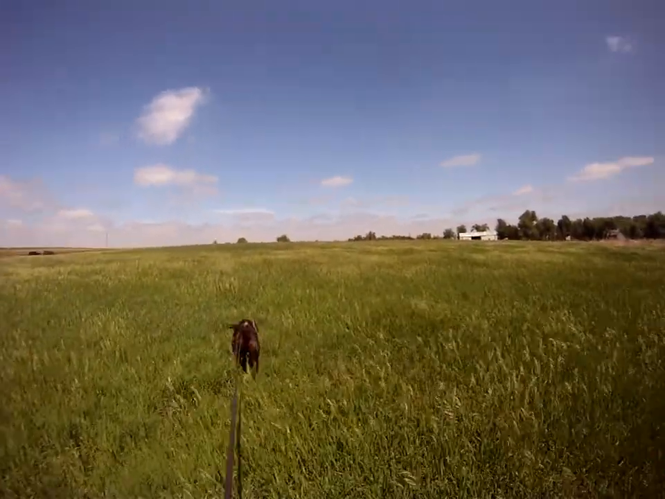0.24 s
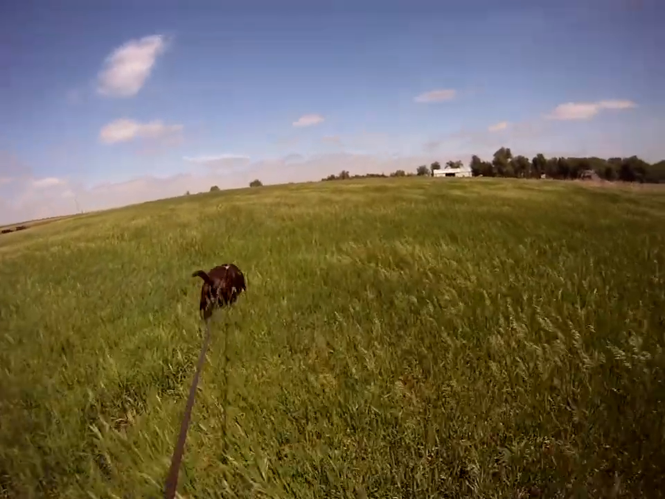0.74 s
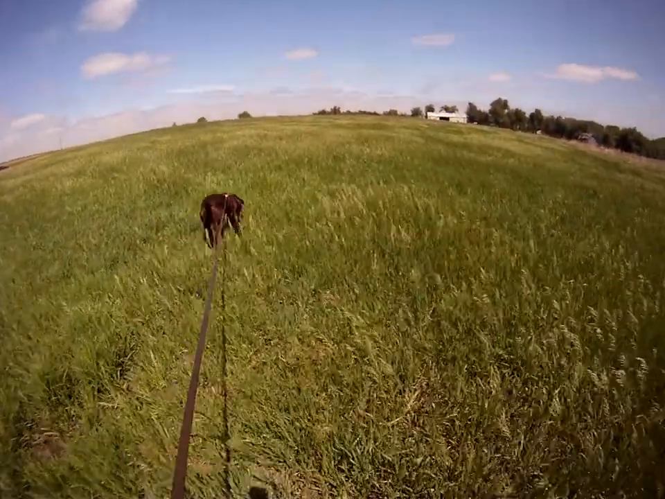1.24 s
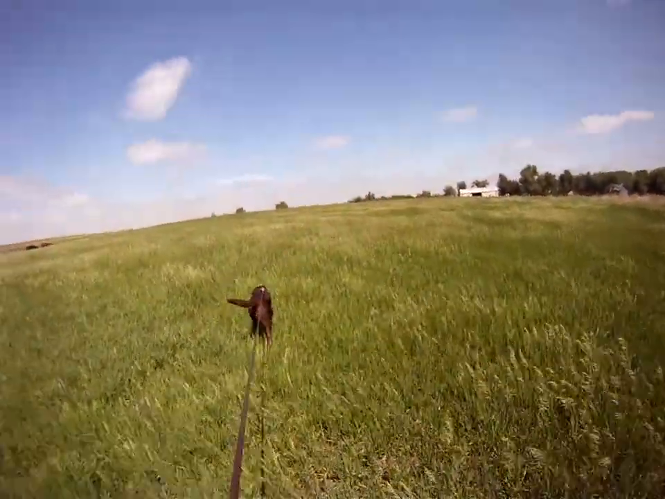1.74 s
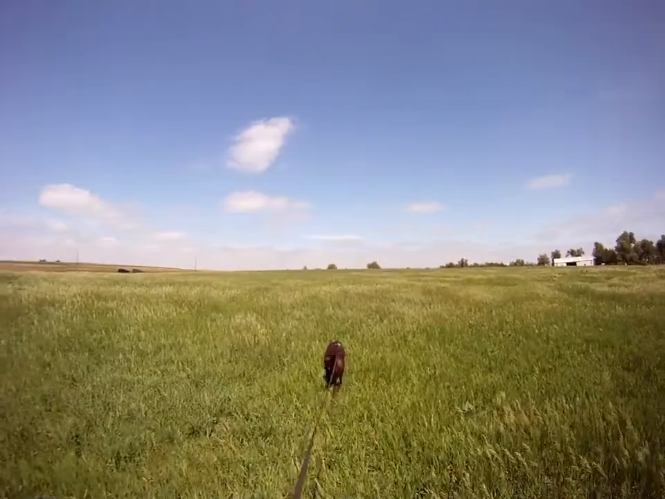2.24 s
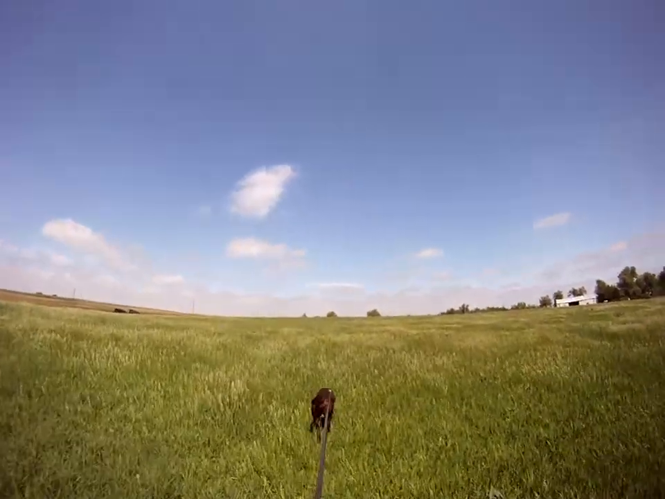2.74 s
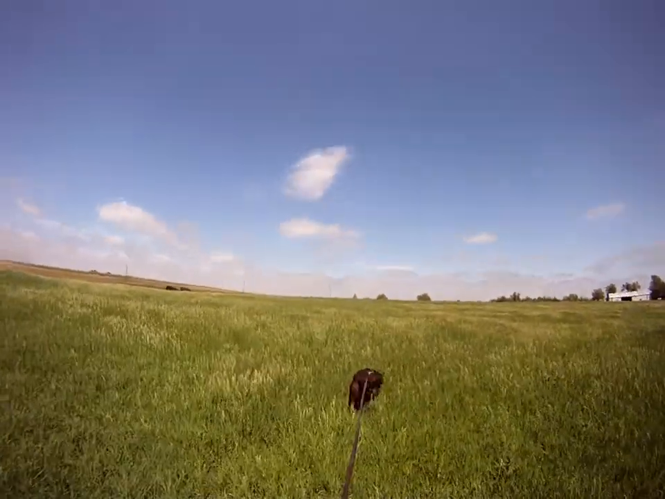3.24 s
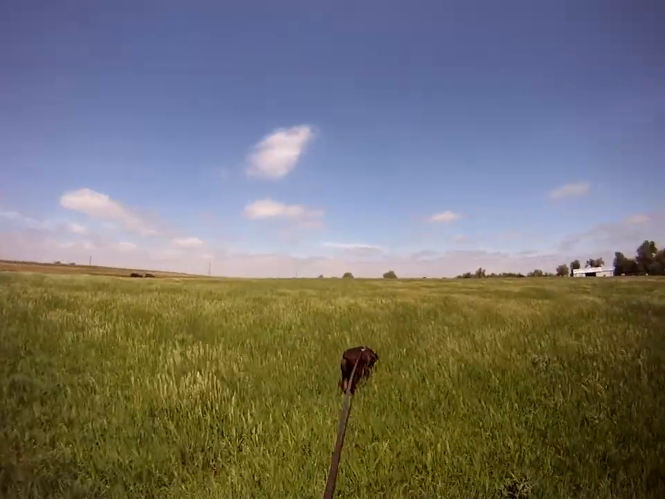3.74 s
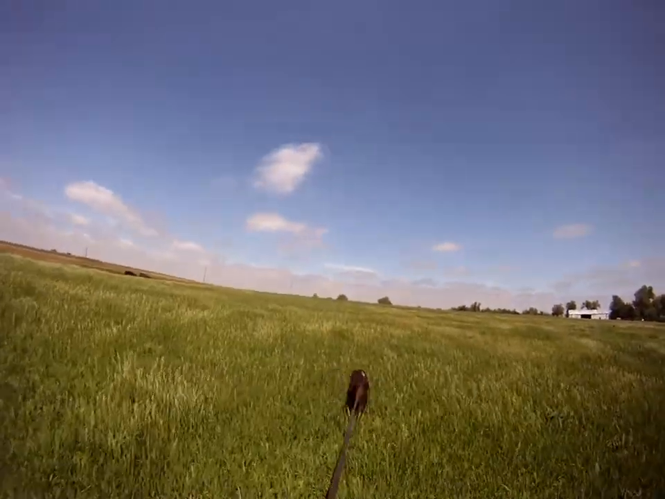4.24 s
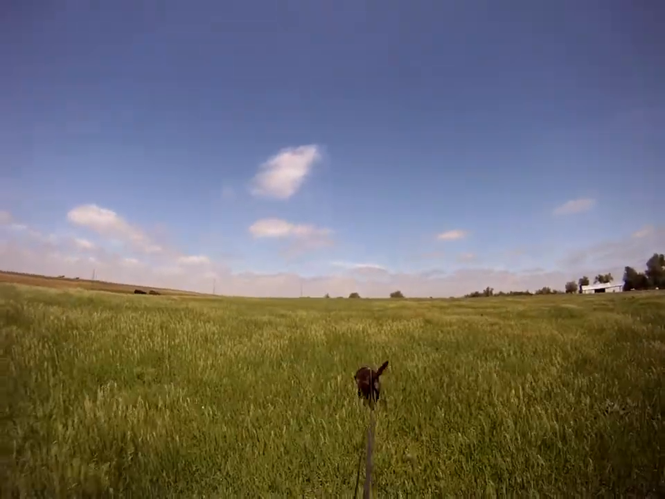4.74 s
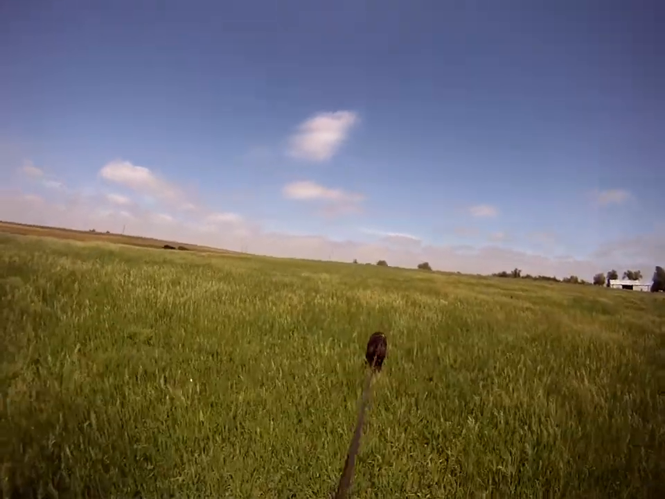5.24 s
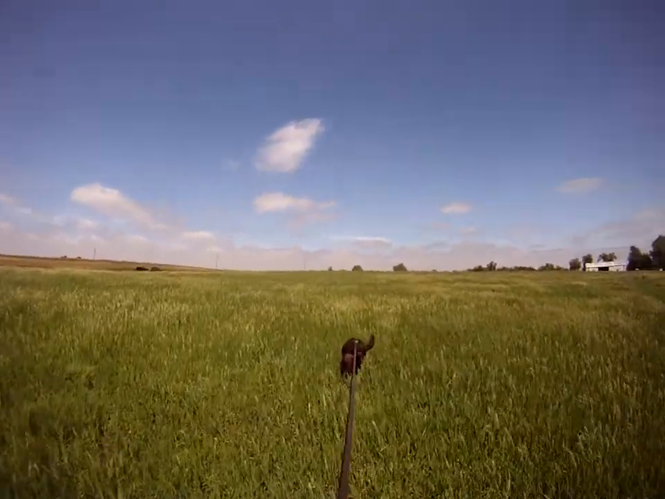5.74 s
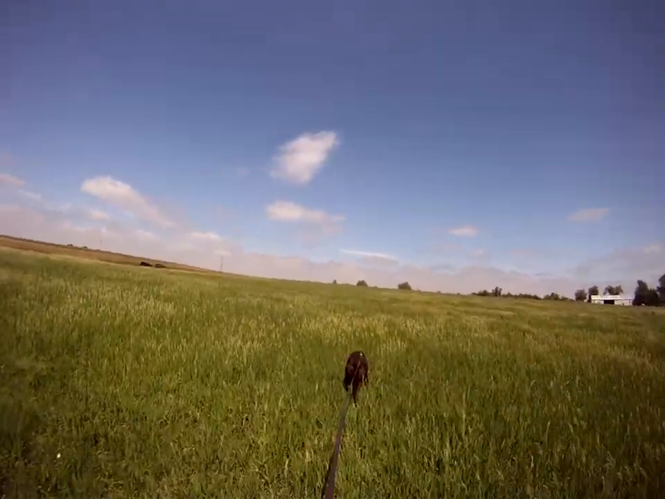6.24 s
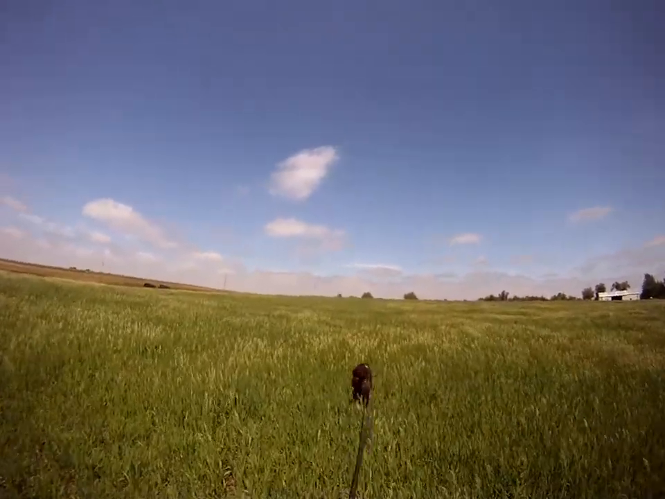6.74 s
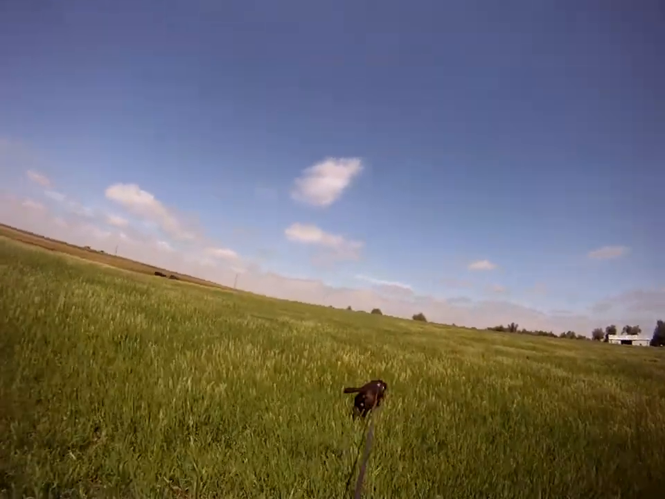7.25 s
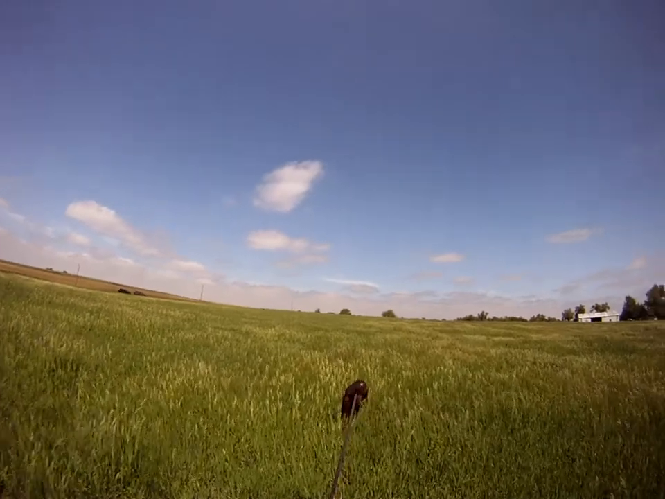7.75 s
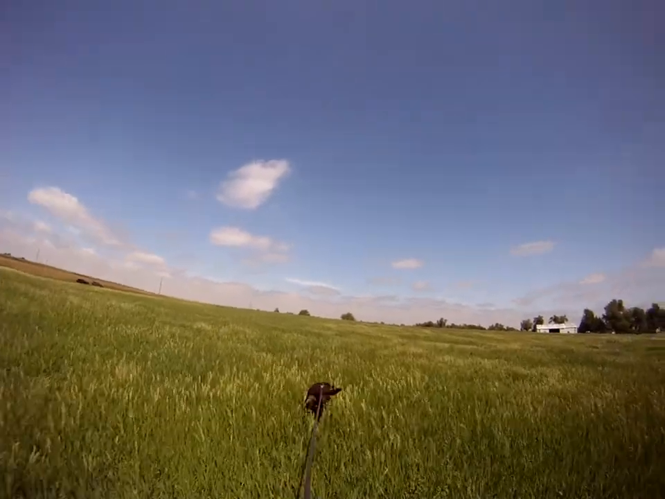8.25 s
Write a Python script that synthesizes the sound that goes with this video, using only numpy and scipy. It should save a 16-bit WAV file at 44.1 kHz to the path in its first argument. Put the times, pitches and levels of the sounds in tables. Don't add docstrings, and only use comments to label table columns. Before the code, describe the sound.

Someone walks at an even pace through an open grassy field. The close, boxy, low-quality pickup turns footfalls into very low body thuds, while a loose piece inside the case makes short bright clicks and fast dying bounces. Stems brush softly past, occasionally dragging on the case. Light wind buffets beneath. One faint bird whistle passes, then two hollow strap taps; walking continues to the end.

```python
import sys
import numpy as np
from scipy import signal
from scipy.fft import rfft, irfft, next_fast_len
from scipy.io import wavfile

SR = 44100
rng = np.random.default_rng(int(sys.argv[2]) if len(sys.argv) > 2 else 0)


def pcm_store(signal):
    levels = np.round(np.clip(np.atleast_2d(signal), -1, 1) * 32767)
    wavfile.write(sys.argv[1], SR, levels.astype(np.int16).T)


def amplitude_ratio(level_db):
    exponent = np.asarray(level_db, float) / 20
    return 10 ** exponent


N = 373963

# crest in seconds, peak in dB, sway in Hz, rebound delay in seconds, rebound peak in dB.
FOOTFALLS = [(0.305, -24, 28.3, 0.069, -26.5), (0.862, -21.5, 32.6, 0.05, -29),
             (1.39, -20.5, 32, 0.05, -28), (1.927, -20.6, 25.6, 0.031, -36), (2.496, -21.5, 40, 0.07, -22),
             (3.005, -25.5, 29.5, 0.065, -30.5), (3.449, -19.5, 24.5, 0.061, -28),
             (3.943, -25, 26.6, 0.082, -31.5), (4.456, -35, 15.6, 0.057, -39),
             (4.953, -19.5, 26.5, 0.061, -37), (5.464, -25, 19, 0.061, -38),
             (5.934, -23.5, 31, 0.0736, -30), (6.412, -21.5, 26.3, 0.058, -31),
             (6.914, -26, 28.4, 0.073, -32.5), (7.474, -28, 33.6, 0.032, -41),
             (7.971, -22, 31.4, 0.043, -30.5), (8.423, -17.5, 25, .023, -24.5)]
# crest in seconds,
# peak in dB, sway in Hz.
EXTRA_JOLTS = [(0.823, -33.5, 17), (1.346, -35.5, 17.4), (1.893, -28, 49), (1.958, -28.5, 45), (2.446, -29.5, 33),
               (2.977, -29.5, 30.5), (3.409, -34, 53), (3.913, -36, 40), (4.921, -36, 22), (5.428, -32, 30),
               (7.438, -29, 21), (7.944, -27, 16.5), (8.373, -42, 11)]
# frequency in Hz, level in dB per Hz.
THUD_SPECTRUM = [(35, -17), (55, 11), (80, -3.5), (120, -17), (200, -36), (300, -63)]
JOLT_TURNS = 0.81
REBOUND_HZ = 26.35

# start in seconds, peak in dB, first flight in seconds, loss in dB a bounce.
DROPS = [(0.1, -38.5, 0.014, 1.5), (.134, -44, 0.0054, 1), (.391, -30.5, 0.0082, 4),
         (.8582, -44.5, 0.0058, 4), (.9055, -38.5, 0.0037, 11), (0.9438, -38, 0.0057, 9),
         (1.1735, -42.5, 0.0049, 7), (1.3494, -45.5, .0054, 2.5), (1.4633, -42, 0.0054, 3),
         (1.779, -41.5, 0.0099, -1.5), (1.9957, -39.5, 0.0042, 11), (2.014, -29, 0.011, 6.5),
         (2.2934, -36.5, 0.011, 2), (2.439, -40, .0056, 4.5), (2.5181, -38, 0.0028, 8),
         (2.6805, -30, 0.011, 1), (2.9569, -40.5, 0.009, 8), (3.4212, -40.5, 0.005, 0),
         (3.4628, -36.5, 0.0062, 6), (3.7989, -30.5, 0.011, 5), (4.2312, -42.5, 0.0078, 1),
         (4.6448, -41, 0.0092, 8), (4.9977, -26.5, 0.0073, 5.5), (5.4934, -26.5, 0.0076, 2),
         (5.6902, -42, 0.0084, -1.3), (5.9424, -38.5, .0135, 3.5), (6.3683, -39.5, 0.0092, 5),
         (6.4345, -29, 0.0062, 2.5), (6.6457, -44.5, 0.0084, 4.5), (7.1522, -45.5, 0.0075, 0.5)]
# time in seconds, peak in dB.
TICKS = [(1.4296, -50), (1.5223, -38.5), (1.7629, -37), (1.8659, -43.5), (2.2887, -34.5), (2.5754, -42),
         (3.5886, -42.5), (4.2184, -46.5), (4.9605, -44), (5.2789, -41), (5.2886, -33.5), (5.3077, -43),
         (5.4423, -37.5), (5.4729, -45), (5.5885, -44), (6.0981, -44), (6.422, -42), (6.6309, -41),
         (8.0427, -42), (8.4173, -41.5),
         (0.4292, -43.5), (.5053, -50), (.9217, -50), (1.1699, -49), (1.2384, -48), (1.401, -51),
           (1.744, -47), (1.8822, -47), (1.9512, -45), (2.6509, -49), (2.9166, -49), (2.9769, -52),
           (3.2307, -49.5), (4.0292, -52.5), (4.6143, -53), (5.0921, -48), (5.5177, -47), (5.6844, -54),
           (5.7183, -48), (5.7303, -48), (5.3182, -52), (3.5786, -52), (6.0165, -55), (6.1932, -48.5),
           (6.1994, -51), (6.3601, -44), (7.0453, -50.5), (8.1033, -50), (8.1748, -48), (8.1816, -51)]
# frequency in Hz, level in dB, 60 dB decay in seconds.
CASE_MODES = [(1850, -7, 0.0082), (2258, -3, 0.01), (3000, -34.5, 0.0012), (3365, -7, 0.022),
              (3776, 5, 0.0089), (4020, -30, 0.011), (4455, -3, 0.0087), (4850, -2, 0.0069),
              (5600, -22, 0.0075), (5860, -1, 0.0047)]
FLIGHT_SHRINK, TIRING_DB, UNEVEN_DB = 0.75, 1.1, -1
LEAD_IN_S, LEAD_IN_DB, LEAD_IN_FOLLOWS = 0.004, -53.5, 0.31
CHATTER_S, CHATTER_DB, CHATTER_SPREAD_DB = 0.0032, -14.5, 2
MODE_SCATTER_DB = 2.0
DIP_HZ, DIP_WIDTH_HZ = 4270, 200

# time in seconds, peak in dB, mode in Hz, 60 dB decay in seconds.
STRAP_TAPS = [
    (5.638, -30, 997, 0.019),
    (5.638, -53, 1150, 0.01),
    (6.098, -31.5, 1476, 0.016),
    (6.098, -23, 1680, 0.0074),
    (6.098, -27.5, 2110, 0.0094),
    (6.098, -39, 900, 0.014),
]

# middle in seconds, half-length in seconds, port in dB, hollow in dB.
DRAGS = [
    (1.512, 0.027, -53, -64),
    (2.296, 0.054, -61, -80),
    (3.388, 0.094, -75, -63.5),
    (3.993, 0.022, -57.5, -78),
    (4.883, 0.053, -54.5, -64),
    (6.85, 0.028, -54, -56),
    (8.367, 0.072, -52.5, -63),
]
PORT_HZ, HOLLOW_HZ, DRAG_T60_S = 2020, 995, 0.014

# middle in seconds, half-length in seconds, port in dB, hollow above port in dB.
SWEEPS = [(0.285, 0.13, -65.5, 4.5), (0.698, 0.054, -68, -19), (0.907, 0.13, -66, 1.5),
          (1.135, 0.096, -66.5, -.7), (1.373, 0.024, -61, 3), (1.553, 0.15, -59.5, -1.5),
          (1.76, 0.12, -65.5, 3.5), (1.914, 0.045, -61.5, 1), (2.302, 0.042, -66, -12),
          (2.53, 0.066, -66.5, 4), (2.78, 0.11, -71, -2), (3.036, 0.047, -61.5, 3),
          (3.227, 0.073, -63.5, 2.5), (3.41, 0.041, -64, -7), (3.643, 0.08, -69, 1), (3.943, 0.053, -67, 4),
          (4.216, 0.044, -67, -2), (4.635, 0.071, -64, 2), (4.892, 0.072, -57.5, -.7),
          (5.164, 0.11, -78, 9), (5.49, 0.027, -75, -5), (5.68, 0.13, -65.5, -1), (5.963, 0.042, -62, -2),
          (6.394, 0.043, -67, 8), (6.57, 0.087, -66, 0.5), (6.813, .09, -60, -1), (7.36, 0.51, -72.5, -7),
          (7.708, 0.11, -64.5, -10), (7.946, 0.04, -70, -1.5), (8.355, 0.23, -59.5, 1)]
# frequency in Hz, level in dB per Hz.
PORT_SPECTRUM = [(1000, -59), (1450, -10), (1760, -13), (1900, -3.5), (2150, -2.5), (2450, -8), (2800, -10),
                 (3200, -20.5), (3650, -9.5), (4300, -20.5), (4700, -29), (5900, -8.5), (7000, -60)]
# frequency in Hz, level in dB per Hz.
HOLLOW_SPECTRUM = [(600, -21.5), (760, -11.5), (980, -2), (1250, -5), (1550, -26.5), (1900, -23.5)]
# frequency in Hz, level in dB per Hz.
HISS_SPECTRUM = [(76, -44), (130, -5.5), (547, -8.5), (1120, -12), (1670, -16), (2120, -8.5), (2660, -18),
                 (3170, -16.5), (3650, -15), (5030, -19), (5900, -14), (7670, -51), (13000, -120)]
HISS_DB = -62.5
REST_DB, REST_HOLLOW_DB = -68, -68.5

# time in seconds, level in dB.
WIND = [(0.0, -52), (0.68, -58), (0.94, -51), (1.41, -60.5), (1.72, -58), (1.94, -57), (2.22, -61),
        (2.53, -60), (3.05, -60), (3.4, -62.5), (3.61, -63), (5.36, -63), (5.64, -61.5), (6.14, -63.5),
        (6.5, -62.5), (7.79, -65.5), (8.01, -62.5), (8.48, -63.5)]
# time in seconds, level in dB.
ROCKING = [(0.0, -45), (0.21, -47), (1.44, -48), (1.65, -53), (2.0, -45), (2.27, -52.5), (2.43, -44),
           (3.28, -53.5), (3.64, -47), (4.27, -57), (4.6, -47.5), (5.5, -46.5), (5.64, -51), (6.0, -51),
           (6.14, -53.5), (8.03, -50.5), (8.22, -55), (8.48, -50)]
# frequency in Hz, level in dB per Hz.
SWAY_SPECTRUM = [(12, -11.5), (20, 4.5), (32, -1.5), (45, 0.5), (65, -19.5), (100, -34), (140, -44)]
# frequency in Hz, level in dB per Hz.
BUFFET_SPECTRUM = [(45, -33), (70, -3.5), (110, -4.5), (170, -9.5), (300, -15), (420, -21.5), (700, -32),
                   (1000, -54)]
LURCH_DB, LURCH_LEAD_S, LURCH_HALF_S = 4, 0.025, 0.11

# time in seconds, pitch in Hz, level in dB.
BIRD = [
    [(3.65, 2800, -72), (3.67, 2850, -68), (3.70, 2800, -64)],
    [(3.72, 2880, -64), (3.74, 2800, -68), (3.765, 2700, -74)],
    [(3.77, 2690, -61), (3.81, 2400, -58), (3.86, 2330, -63), (3.9, 2200, -74)],
]

HOLD_HZ, EDGE_HZ, TOP_HZ = 12000.1, 5935, 15200


def steps():
    sways, thuds = np.zeros(N + SR), np.zeros(N + SR)
    for crest_s, peak_db, sway_hz in jolts():
        rise_s = JOLT_TURNS / sway_hz
        age = np.arange(int(5 * rise_s * SR)) / SR / rise_s
        swell = amplitude_ratio(peak_db) * age ** 2 * np.exp(2 - 2 * age)
        start = round((crest_s - rise_s) * SR)
        span = slice(start, start + len(age))
        thuds[span] += swell
        sways[span] += swell * np.cos(2 * np.pi * JOLT_TURNS * (age - 1))
    rough = coloured(rng.standard_normal(N), THUD_SPECTRUM)
    return sways[:N] + amplitude_ratio(-20) * thuds[:N] * rough


def jolts():
    yield from EXTRA_JOLTS
    for crest_s, peak_db, sway_hz, later_s, rebound_db in FOOTFALLS:
        yield crest_s, peak_db, sway_hz
        yield crest_s + later_s, rebound_db, REBOUND_HZ


def rattle():
    touch_s, peak_db = touches()
    at = (touch_s * SR).astype(int)
    luck = rng.standard_normal((len(at), len(CASE_MODES) + 1))
    early_at = at - (SR * 0.0006 * amplitude_ratio(2.4 * luck[:, -1])).astype(int)
    hits = np.zeros(N)
    hits[at] = amplitude_ratio(-42 + 0.7 * (peak_db + 42))
    decay = amplitude_ratio(-60 / (0.017 * SR))
    scuff = amplitude_ratio(-21.5) * signal.lfilter([1], [1, -decay], hits) * rng.standard_normal(N)
    out = np.zeros(N)
    for k, (hz, level_db, t60) in enumerate(CASE_MODES):
        sign = (-1) ** k
        clicks = scuff * amplitude_ratio(level_db)
        clicks[at] += sign * amplitude_ratio(peak_db + level_db + MODE_SCATTER_DB * luck[:, k])
        clicks[early_at] += sign * amplitude_ratio(peak_db + level_db - 8.5)
        out += ring(clicks, hz, t60)
    out = signal.lfilter(*signal.iirnotch(DIP_HZ, DIP_HZ / DIP_WIDTH_HZ, fs=SR), out)
    return amplitude_ratio(-3.0) * signal.sosfilt(signal.butter(4, 1200, "high", fs=SR, output="sos"), out)


def touches(count=6):
    drop_s, peak_db, flight_s, loss_db = np.transpose(DROPS)[:, :, None]
    k = np.arange(count)
    luck = rng.standard_normal((len(DROPS), count))
    bounce_s = drop_s + flight_s * (1 - FLIGHT_SHRINK ** k) / (1 - FLIGHT_SHRINK)
    bounce_db = peak_db - loss_db * k - TIRING_DB * k ** 2 + UNEVEN_DB * luck * (k > 1)
    lead_in_s = drop_s.ravel() - LEAD_IN_S
    lead_in_db = LEAD_IN_DB + LEAD_IN_FOLLOWS * (peak_db.ravel() - peak_db.mean())
    single_s, single_db = np.transpose(TICKS)
    s = np.r_[single_s, bounce_s.ravel(), lead_in_s]
    db = np.r_[single_db, bounce_db.ravel(), lead_in_db]
    late, weak = rng.standard_normal((len(s), 2)).T
    chatter_s = s + CHATTER_S * amplitude_ratio(2.5 * late)
    chatter_db = db + CHATTER_DB + CHATTER_SPREAD_DB * weak
    return np.r_[s, chatter_s], np.r_[db, chatter_db]


def taps():
    out = np.zeros(N)
    for s, peak_db, hz, t60 in STRAP_TAPS:
        click = np.zeros(N)
        click[round(s * SR)] = amplitude_ratio(peak_db + 3)
        padding = signal.butter(2, [0.86 * hz, 1.45 * hz], "band", fs=SR, output="sos")
        out += signal.sosfilt(padding, ring(click, hz, t60))
    return out


def drags():
    t, port_gain, hollow_gain = np.arange(N) / SR, np.zeros(N), np.zeros(N)
    for s, half_s, port_db, hollow_db in DRAGS:
        swell = np.exp(-((t - s) / half_s) ** 2)
        port_gain += amplitude_ratio(port_db) * swell
        hollow_gain += amplitude_ratio(hollow_db) * swell
    rub = grains(1800, spread_db=1.5)

    def sung(hz):
        return rms_one(ring(ring(rub, hz, DRAG_T60_S), hz, DRAG_T60_S / 2))

    return port_gain * sung(PORT_HZ) + hollow_gain * sung(HOLLOW_HZ)


def grass():
    s, half_s, sweep_db, hollow_db = np.transpose(SWEEPS)
    port_gain = amplitude_ratio(REST_DB) + bell_swells(s, half_s, amplitude_ratio(sweep_db))
    hollow_gain = amplitude_ratio(REST_HOLLOW_DB) + bell_swells(s, half_s, amplitude_ratio(sweep_db + hollow_db))
    flutter_db = 1.4
    gusts = drift(41)
    port_gain = port_gain * amplitude_ratio(-1.1 + flutter_db * (gusts + drift(50)))
    hollow_gain = hollow_gain * amplitude_ratio(-4.5 + flutter_db * (gusts + drift(20)))
    port = coloured(grains(2500, spread_db=0.5), PORT_SPECTRUM) * port_gain
    hollow = coloured(grains(1500, spread_db=2.0), HOLLOW_SPECTRUM) * hollow_gain
    hiss = amplitude_ratio(HISS_DB) * coloured(rng.standard_normal(N), HISS_SPECTRUM)
    return port + hollow + hiss


def wind():
    buffet_db, = in_time(WIND)
    rocking_db, = in_time(ROCKING)
    lurch_db = bell_swells(np.transpose(FOOTFALLS)[0] - LURCH_LEAD_S, LURCH_HALF_S, LURCH_DB)
    sway_gain = amplitude_ratio(rocking_db + lurch_db + 0.5 + 2.9 * drift(3.2))
    buffet_gain = amplitude_ratio(buffet_db - 0.5 + 2.3 * drift(17.5))
    sway = coloured(rng.standard_normal(N), SWAY_SPECTRUM) * sway_gain
    return sway + coloured(rng.standard_normal(N), BUFFET_SPECTRUM) * buffet_gain


def bird():
    t, out = np.arange(N) / SR, np.zeros(N)
    for note in BIRD:
        hz, db = in_time(note)
        edge = np.clip(np.minimum(t - note[0][0], note[-1][0] - t) / 0.005, 0, 1)
        tone = np.sin(2 * np.pi * np.cumsum(hz) / SR)
        out += edge * amplitude_ratio(db + 1.5 * drift(40)) * tone
    return out


def ring(clicks, hz, t60):
    r, w = amplitude_ratio(-60 / (t60 * SR)), 2 * np.pi * hz / SR
    return signal.lfilter([0, np.sin(w)], [1, -2 * r * np.cos(w), r * r], clicks + 1e-18)


def grains(per_s, spread_db):
    sizes = amplitude_ratio(spread_db * np.minimum(rng.exponential(1, N), 4))
    sizes = sizes * rng.choice([-1, 1], N)
    return sizes * (rng.random(N) < per_s / SR)


def coloured(x, spectrum):
    size = next_fast_len(N)
    hz, db = np.transpose(spectrum)
    log_hz = np.log(np.arange(size // 2 + 1) * SR / size + 1)
    gain = amplitude_ratio(np.interp(log_hz, np.log(hz), db))
    return rms_one(irfft(rfft(x, size) * gain, size)[:N])


def rms_one(x):
    return x / np.sqrt(np.mean(x ** 2) + 1e-20)


def drift(rate):
    r = np.exp(-80 * np.pi * rate / SR)
    noise = rng.standard_normal(N // 40 + 2002)
    slow = signal.lfilter([1], [1, -2 * r, r * r], noise)[2000:]
    return np.interp(np.arange(N) / 40, np.arange(len(slow)), rms_one(slow))


def bell_swells(s, half_s, height):
    t = np.arange(0, N, 40) / SR
    bells = height * np.exp(-((t[:, None] - s) / half_s) ** 2)
    return np.interp(np.arange(N) / SR, t, np.sum(bells, axis=1))


def in_time(rows):
    s, *columns = np.transpose(rows)
    return [np.interp(np.arange(N) / SR, s, column) for column in columns]


def scene():
    return (steps() + rattle() + taps() + drags() + grass() + wind() + bird())[None]


def top_cut(x):
    return signal.sosfilt(signal.butter(12, 16210, fs=SR, output="sos"), x)


def record(dry):
    x = signal.sosfilt(signal.cheby2(8, 40, EDGE_HZ * 1.086, fs=SR, output="sos"), dry)
    x = x * (1 + 2 * np.cos(2 * np.pi * HOLD_HZ * np.arange(N) / SR))
    x = signal.sosfilt(signal.cheby1(11, 1, TOP_HZ, fs=SR, output="sos"), x)
    size = next_fast_len(N)
    droop = np.sinc(np.arange(size // 2 + 1) * SR / size / HOLD_HZ)
    mix = irfft(rfft(x, size) * droop, size)[:, :N]
    return top_cut(mix)


dry = scene()
out = record(dry)
pcm_store(out)
```